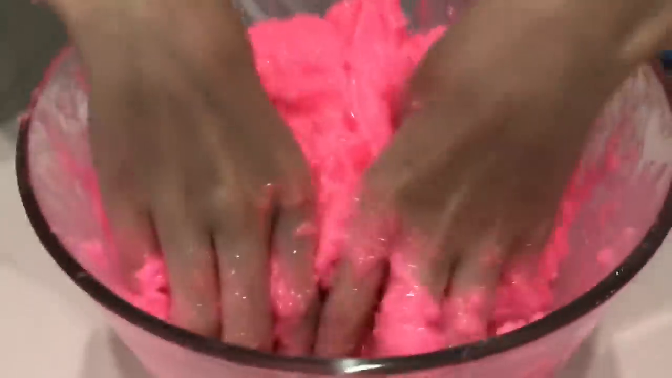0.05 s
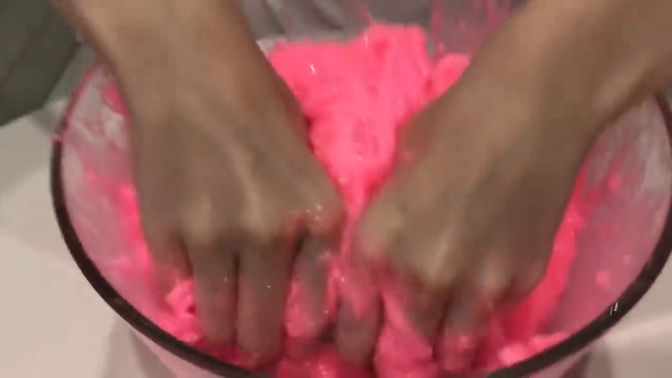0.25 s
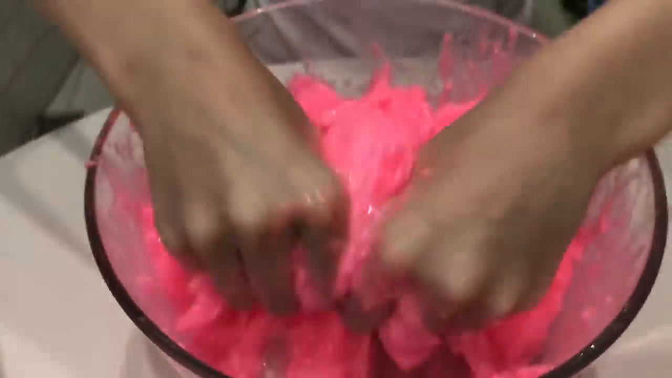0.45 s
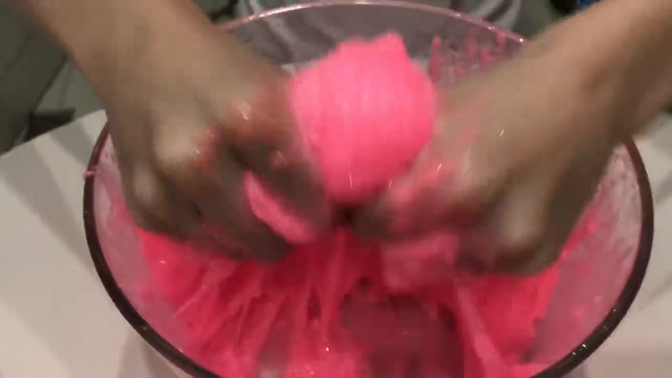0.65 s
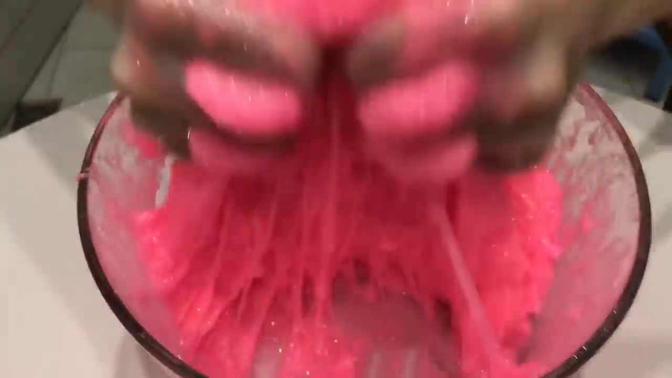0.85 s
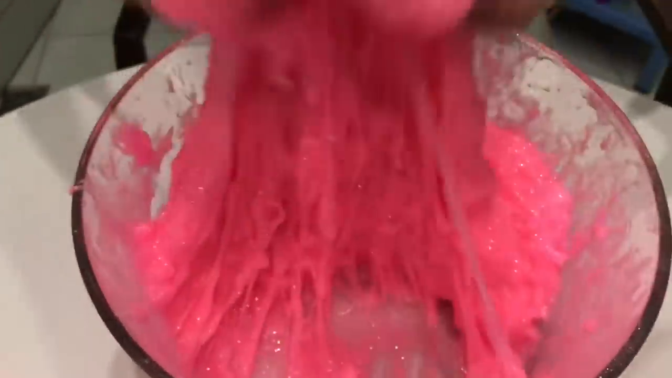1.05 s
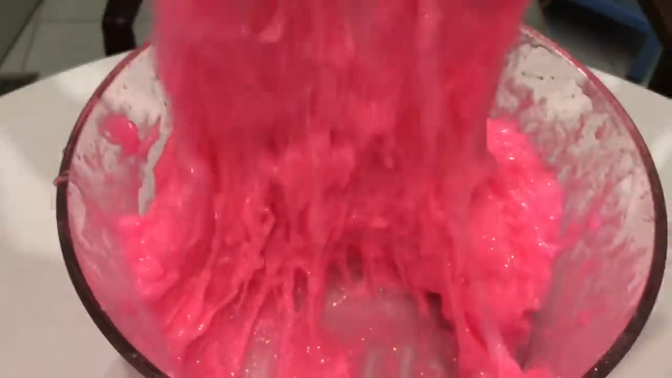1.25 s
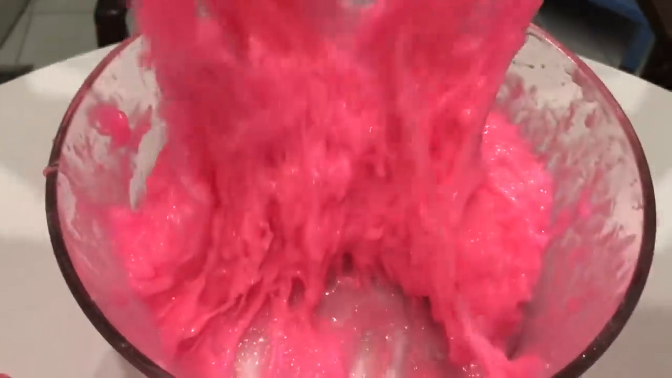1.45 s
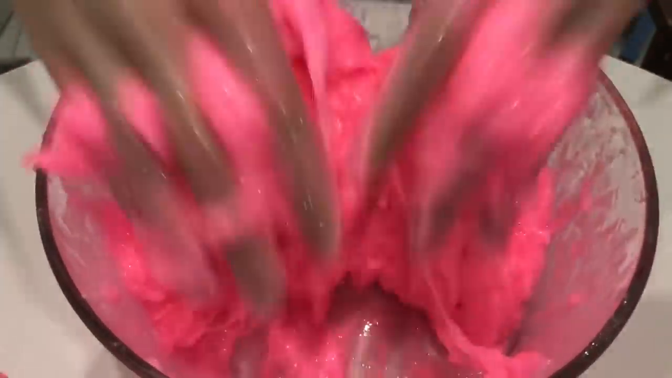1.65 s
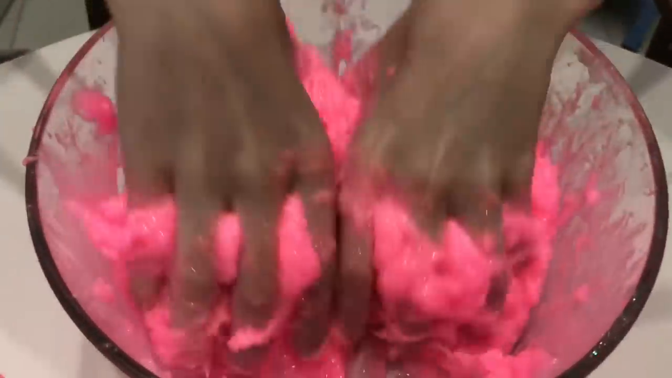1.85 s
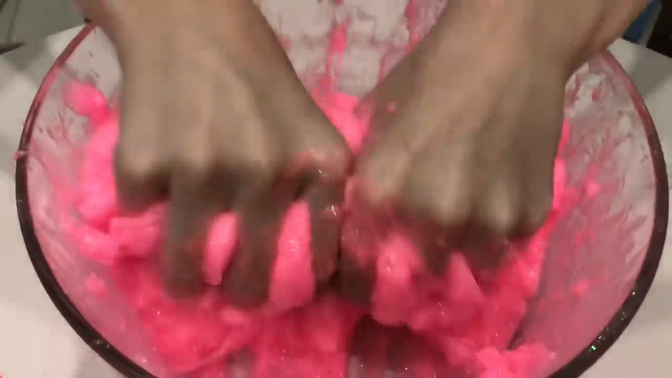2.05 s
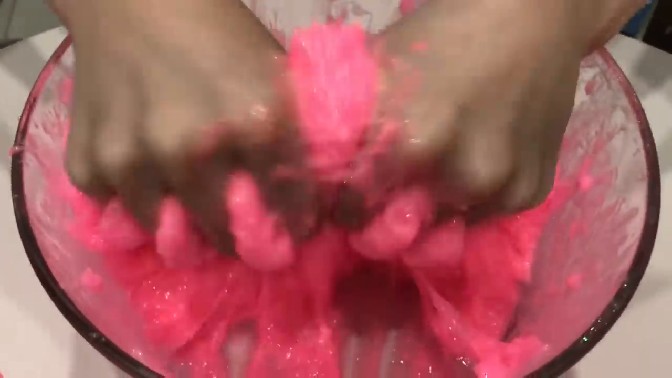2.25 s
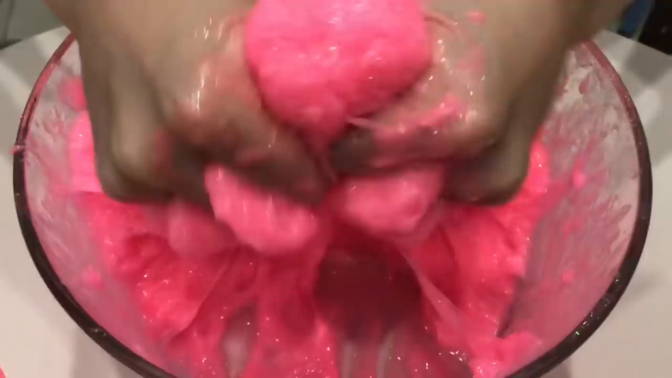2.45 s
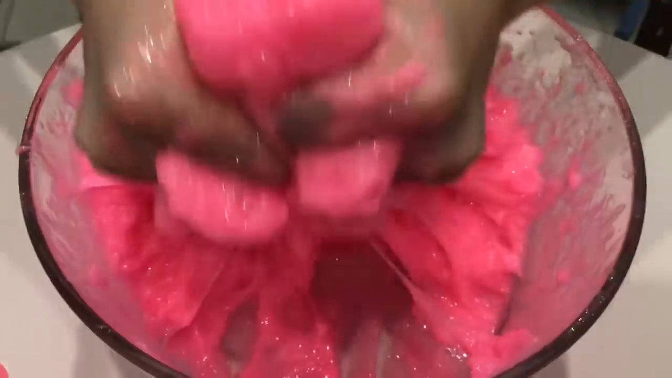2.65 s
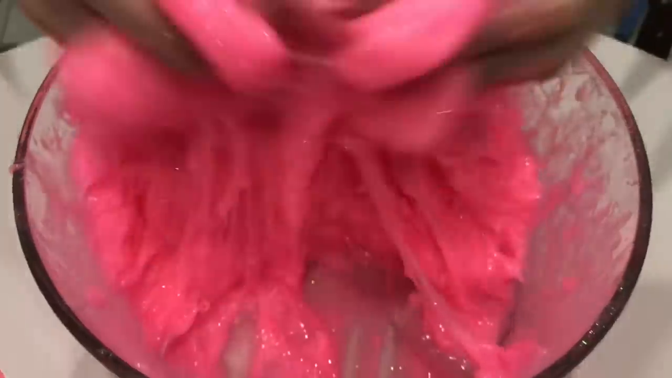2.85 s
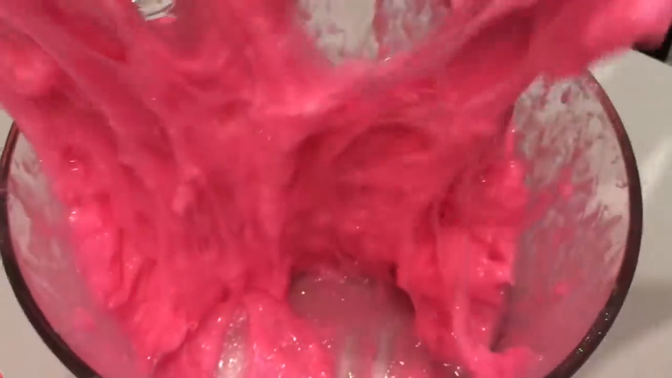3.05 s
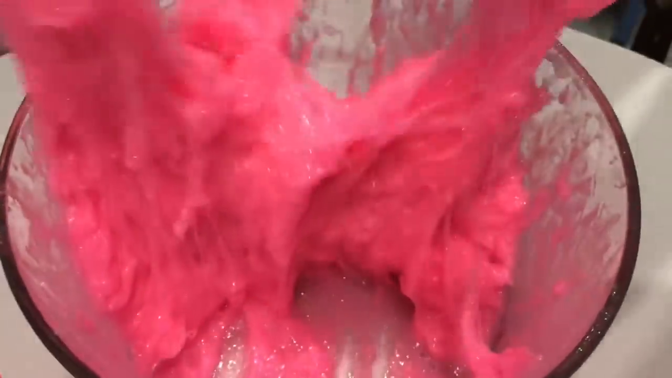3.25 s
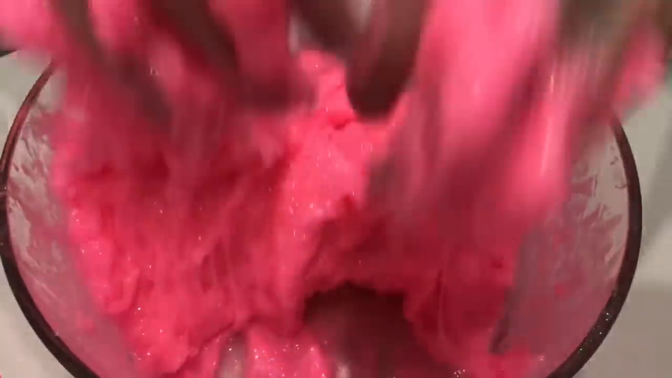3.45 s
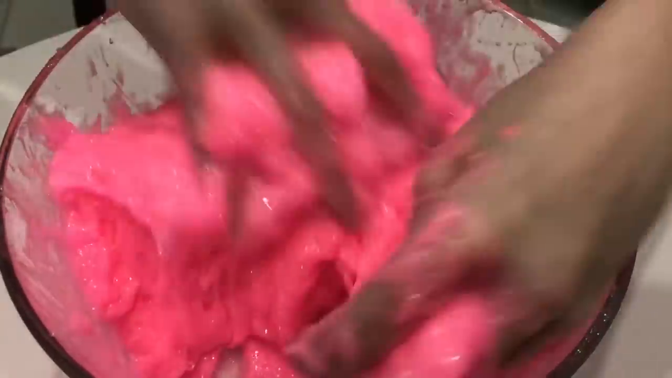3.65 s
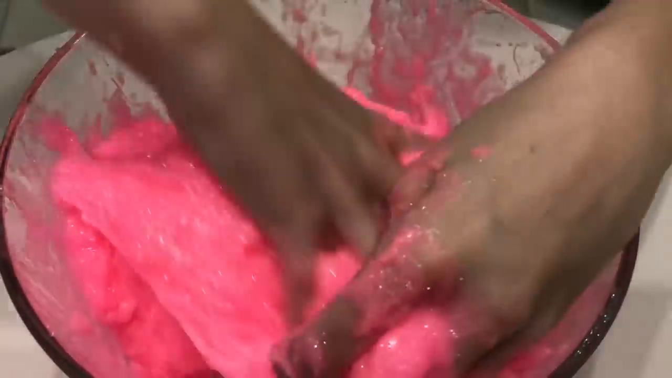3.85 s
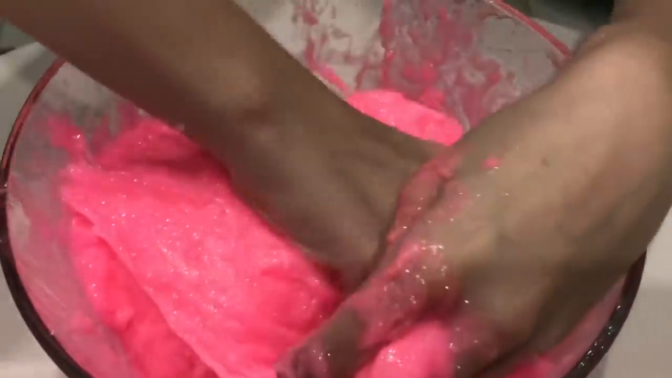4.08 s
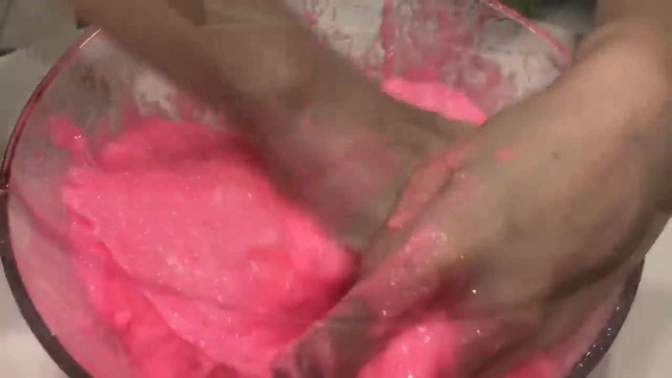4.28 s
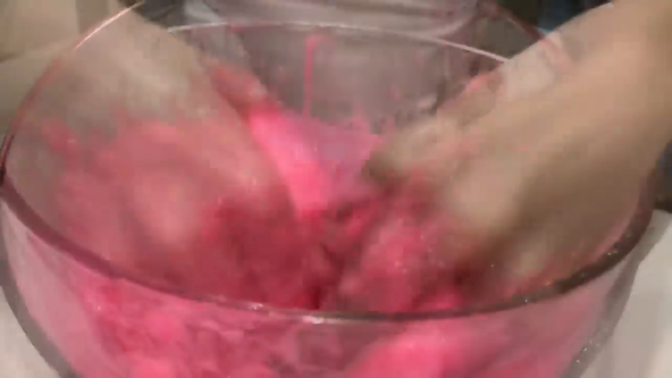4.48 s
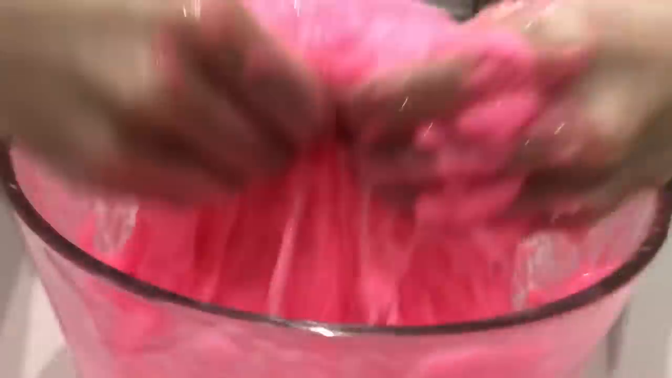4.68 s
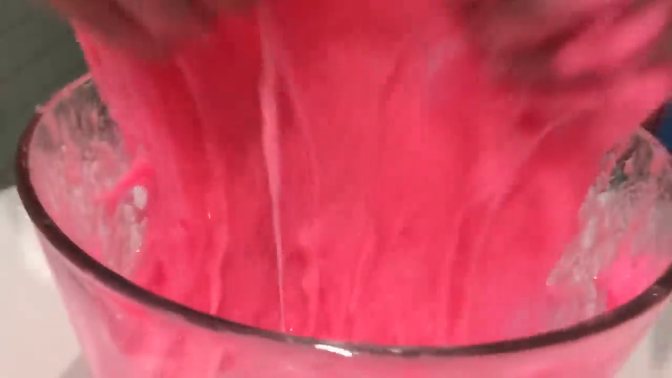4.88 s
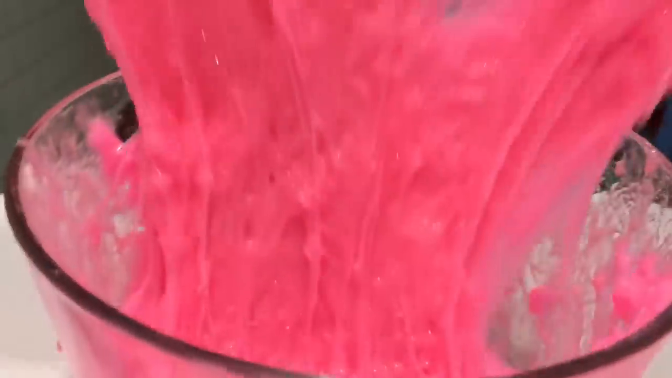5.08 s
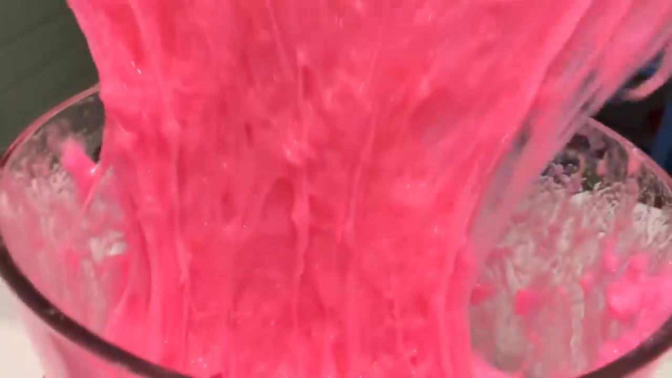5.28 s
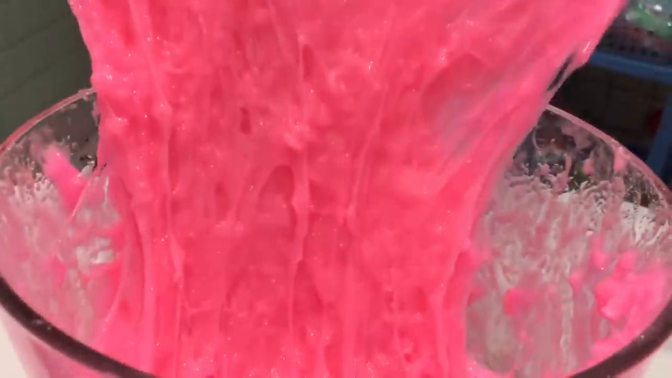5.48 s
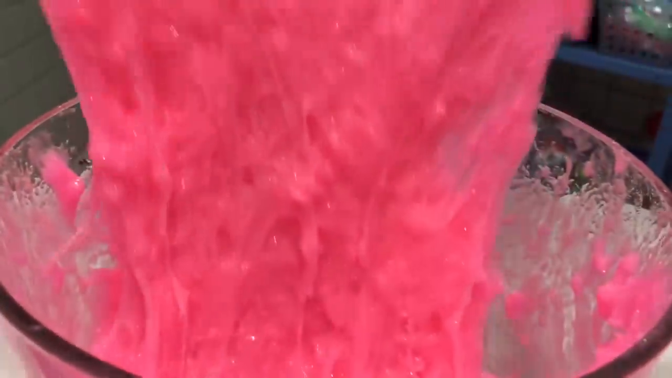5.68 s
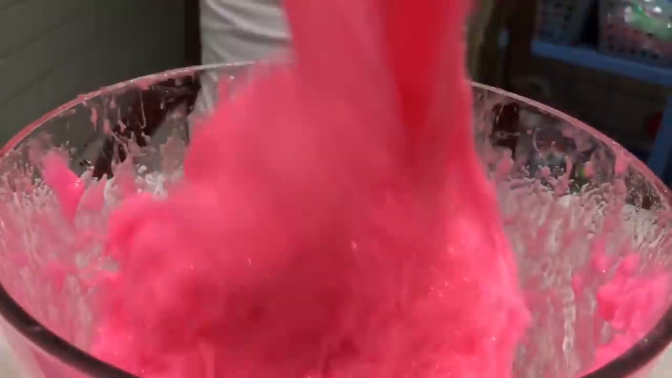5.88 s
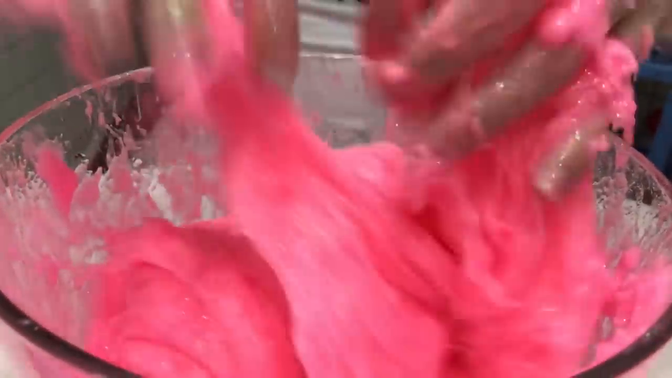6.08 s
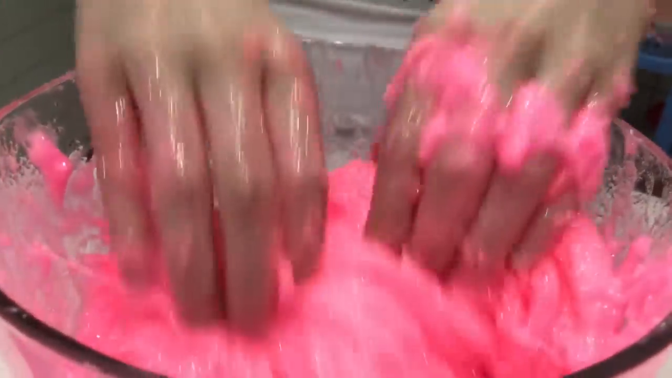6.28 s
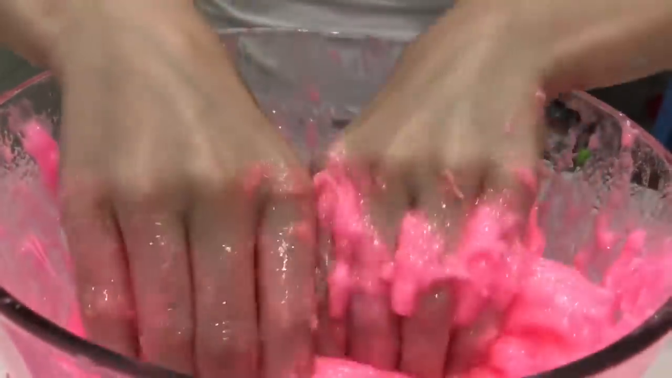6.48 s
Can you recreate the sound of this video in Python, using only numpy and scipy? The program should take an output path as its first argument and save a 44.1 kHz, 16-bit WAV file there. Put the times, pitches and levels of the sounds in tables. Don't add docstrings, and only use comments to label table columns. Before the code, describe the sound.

Thick slime is squeezed and stretched in a bowl beside a phone microphone. Wet, gluey crackling and crisp snaps come in uneven clusters, with trapped air bursting in short, round pops. After a brief lull midway the kneading returns, and low, woody-glassy rubbing hums swell as the bowl shifts. The crackle then thins before one big low pop and a last small flurry. Short room reflections, soft room tone and far hum.

```python
import sys
import numpy as np
from scipy import signal
from scipy.io import wavfile
from scipy.ndimage import uniform_filter1d

SR = 44100
rng = np.random.default_rng(int(sys.argv[2]) if len(sys.argv) > 2 else 0)


def store_wav(level_fs):
    pcm = np.round(np.clip(np.atleast_2d(level_fs), -1, 1) * 32767)
    wavfile.write(sys.argv[1], SR, pcm.T.astype(np.int16))


def rack_gain(trim_db):
    fader = np.asarray(trim_db, float)
    return 10 ** (fader / 20)


N = 287541


def evened(x):
    return x / np.sqrt(np.mean(x ** 2) + 1e-20)


def read(points, hz):
    f, value = np.transpose(points)
    return np.interp(np.log(hz + 1), np.log(f + 1), value)


def curve(rows, order):
    rows = np.array(rows)
    return np.interp(np.arange(N) / SR, rows[:, 0], rows[:, order])


def add(mix, start_s, sound):
    part = mix[max(round(start_s * SR), 0):][:len(sound)]
    part += sound[:len(part)]


def resonate(x, hz, width_hz):
    return signal.lfilter(*signal.iirpeak(hz, hz / width_hz, SR), x)


def air():
    # frequency in Hz, density in dB per Hz.
    air_spectrum = [(16, -10), (79, 5.5), (177, 2), (434, -4), (1700, -14), (4420, -16.5), (9500, -23),
                    (16000, -26)]
    # time in seconds, level in dB.
    hiss_drift = [(0.0, -55.5), (0.54, -46), (1.72, -52.5), (1.96, -52.5), (3.59, -59), (3.94, -53),
                  (5.06, -52), (6.52, -58.5)]
    hop, size = 512, 2048
    frames, hz = N // hop + 5, np.fft.rfftfreq(size, 1 / SR)
    real, imag, patches = rng.standard_normal((frames, len(hz), 3)).T
    patches = uniform_filter1d(patches, 20, 0)
    patches = evened(uniform_filter1d(patches, 8, 1))
    drift_db = np.interp(np.arange(frames) * hop / SR, *np.transpose(hiss_drift)) + 58
    share = read([(300, 0.39), (2500, 0.67)], hz)[:, None]
    level_db = read(air_spectrum, hz)[:, None] + 2.56 * patches + share * drift_db
    z = (real + 1j * imag) * rack_gain(level_db)
    noise = signal.istft(z, nperseg=size, noverlap=size - hop)[1][:N]
    return rack_gain(-46) * evened(noise)


def hum():
    return rack_gain(-54.5) * evened(resonate(rng.standard_normal(N), 61.2, width_hz=4.3))


def rub():
    # peak time in seconds, level in dB, length in seconds.
    drags = [(.34, -47, 0.077), (0.516, -35, 0.12), (0.702, -39, 0.046), (0.918, -40, .1),
             (1.064, -37, 0.27), (1.893, -32.5, 0.11), (2.182, -46, 0.083), (3.095, -36, 0.21),
             (4.128, -31.5, 0.15), (4.377, -33, 0.083), (4.49, -30, 0.035), (4.7, -45, 0.069),
             (4.852, -29, 0.18), (5.075, -27.5, 0.075), (5.198, -24, 0.087), (5.392, -33, 0.3)]
    # frequency in Hz, width in Hz, level in dB.
    bowl_modes = [(167, 12, -6), (206, 17, -1), (230, 28, -3), (268, 45, -6), (350, 18, -14),
                  (597, 24, -16), (1110, 110, -22), (2360, 80, -17)]
    rest_db, rise_db, fall_db = -55.5, 19, 26
    t = np.arange(N) / SR
    pull = np.full(N, rack_gain(rest_db))
    for peak_s, db, length_s in drags:
        u = (t - peak_s) / length_s
        pull += rack_gain(db + np.minimum(rise_db * u, -fall_db * u))
    unevenness_db = 1.7 * evened(uniform_filter1d(rng.standard_normal(N), 900))
    slips = rng.standard_normal(N) * rack_gain(unevenness_db)
    slips *= np.roll(pull * rack_gain(15.5), -500)
    modes = np.zeros(N)
    for hz, width_hz, db in bowl_modes:
        ring = resonate(resonate(slips, hz, width_hz), hz, width_hz)
        modes += 4 * rack_gain(db) * ring * np.sqrt(30 / width_hz)
    table_top = rack_gain(-16) * resonate(slips, 520, width_hz=340)
    return modes + table_top


def cavity(hz, turns, glide, rough, noise):
    u = np.arange(len(noise)) * hz / SR / turns
    shape = u ** 1.11 * np.exp(-.6 * u ** 2)
    ring = shape * np.cos(2 * np.pi * turns * (u - 1) * (1 + glide * u))
    fuzz = shape * noise
    for _ in range(2):
        fuzz = resonate(fuzz, 0.9 * hz, 1.83 * hz)
    return (1 - rough) * ring / abs(ring).max() + rough * 1.69 * fuzz / abs(fuzz).max()


def tick(noise, t60_s):
    high = signal.sosfilt(signal.butter(3, 7600, "high", fs=SR, output="sos"), noise)
    t = np.arange(len(noise)) / SR
    attack = 1 - np.exp(-t / 0.00036)
    return 1.42 * evened(high) * attack * rack_gain(-60 * t / t60_s)


def scatter(burst, chance, wall_db, t60_s):
    where, sign = chance
    path = np.zeros(200)
    path[(6 + 190 * where ** 1.5).astype(int)] = 2 * sign - 1
    path *= rack_gain(wall_db - 60 * np.arange(200) / SR / t60_s)
    path[0] = 1
    return np.convolve(burst, path)


def bursts():
    # start in seconds, cavity peak in dB, cavity in Hz.
    clean = [(.2913, -18.5, 1770), (.4078, -22, 4360), (.6121, -2, 2470), (.7034, -16.5, 5170),
             (.8273, -17, 6100), (1.1058, -18, 4560), (2.147, -19, 5820), (2.3441, -9.5, 5300),
             (2.3583, -7, 2940), (2.3628, -10, 2960), (2.3972, -20, 4470), (2.4357, -12.5, 2010),
             (2.6605, -14.5, 2130), (2.7524, -32, 4300), (2.8132, -11, 2220), (2.9551, -12, 2970),
             (3.019, -20.5, 6190), (3.067, -19.5, 2940), (3.6666, -22, 2960), (4.1268, -5, 4800),
             (4.1952, -24, 3140), (4.2526, -18.5, 3860), (4.4343, -11.5, 4350), (4.496, -22.5, 3470),
             (4.8178, -21.5, 3650), (5.233, -11.5, 5760), (5.3237, -5.5, 5870), (5.7763, -14, 5800),
             (6.1755, -21.5, 4650), (6.4144, -23, 5360)]
    # start in seconds, cavity peak in dB, cavity in Hz.
    torn = [(.295, -16.5, 1690), (.3756, -15, 3900), (.6983, -21.5, 4620), (.7163, -20, 3350),
            (.9279, -17, 3740), (1.199, -20, 4500), (1.2247, -18.5, 3600), (1.2486, -2.5, 5300),
            (1.2897, -13, 4850), (1.8142, -15.5, 3760), (1.8338, -15.5, 4260), (1.8775, -17, 3770),
            (1.9082, -21, 5800), (1.978, -15, 2860), (1.9934, -19, 4720), (2.0704, -18, 5430),
            (2.0996, -25, 4830), (2.192, -9, 2860), (2.4428, -7, 2100), (2.947, -9.5, 3520),
            (2.964, -17, 2970), (2.9882, -12.5, 5770), (3.6903, -17.5, 6650), (3.988, -10.5, 5250),
            (4.0607, -15.5, 5450), (4.0778, -4.5, 5000), (4.1197, -9, 5500), (4.3981, -13.5, 2930),
            (4.6097, -15.5, 4250), (5.5891, -21, 5900)]
    # start in seconds, cavity peak in dB, cavity in Hz.
    small = [(.1587, -23, 5430), (.2597, -22, 2620), (.3434, -30, 4380), (.584, -28, 3930),
             (.749, -21.5, 5360), (1.2175, -23, 4950), (1.7021, -24, 5300), (1.794, -25, 4550),
             (2.2555, -27, 2970), (2.5066, -21.5, 4520), (2.7017, -32, 4640), (3.428, -31.5, 5040),
             (3.463, -37, 6100), (3.503, -29.5, 5500), (3.596, -36, 5500), (3.9434, -21.5, 2200),
             (4.087, -24, 4300), (4.165, -22, 3510), (4.3227, -20.5, 1810), (4.392, -17.5, 5250),
             (4.531, -19.5, 4450), (4.7484, -19.5, 3400), (4.9655, -27, 4240), (5.616, -19, 5900),
             (5.6627, -26.5, 5650), (5.8755, -29.5, 3750), (6.118, -24.5, 4500), (6.296, -26.5, 4230),
             (6.4381, -21.5, 5570), (6.4849, -18.5, 4840)]
    # start in
    # seconds, film peak in dB.
    films = [(0.095, -15.5), (0.1804, -20), (0.2497, -20), (0.988, -12), (1.1863, -12.5), (1.2026, -4.5),
             (1.2108, -7), (1.3335, -19.5), (1.3811, -20), (1.437, -25), (1.7511, -21), (1.827, -12),
             (1.84, -11.5), (2.0256, -16), (2.162, -9), (2.278, -19), (2.3393, -6.5), (2.388, -9),
             (2.5525, -22), (2.9204, -10.5), (2.976, -3.5), (3.112, -11.5), (3.842, -12.5), (3.9316, -20.5),
             (4.077, -1), (5.173, -16.5), (5.4226, -18), (5.845, -27), (5.908, -22), (6.365, -20),
             (.3285, -23), (0.447, -13.5), (.7075, -14), (0.815, -29), (1.0826, -29), (1.1268, -32),
               (1.3945, -20), (1.9737, -19), (2.0746, -18), (2.1982, -23), (2.547, -20), (2.7745, -28),
               (3.045, -30), (3.074, -24), (3.532, -30), (3.562, -31), (3.777, -22), (3.8023, -17),
               (3.8367, -18), (4.1593, -19), (4.642, -18.5), (5.0599, -23), (5.606, -23), (5.6737, -21),
               (5.917, -27.5), (5.979, -38), (6.033, -24.5), (6.097, -28), (6.2838, -25), (6.447, -28)]
    rows = []
    for kind, tick_db in ((clean, -23), (torn, -2.5), (small, 0)):
        rows += [(s, db, hz, tick_db) for s, db, hz in kind]
    film_tick_db, film_cavity_hz = 15, 3860
    for s, film_db in films:
        rows.append((s, film_db - film_tick_db, film_cavity_hz, film_tick_db))
    return rows


def tearing():
    starts = np.zeros(N)
    for s, db, hz, tick_db in bursts():
        strength = rack_gain(0.59 * (db + max(tick_db, 0) + 13))
        add(starts, max(s - .012, 0), strength * np.ones(1))
    t = np.arange(6000) / SR
    swell = t / 0.022 * np.exp(1 - t / 0.016)
    return 1 + 0.65 * signal.oaconvolve(starts, swell)[:N]


def crackle():
    # time in seconds, crackle in dB, film tick in dB above the cavities.
    working = [(0.0, -40, -2), (.2, -50, 3), (.47, -38.5, -4.5), (.9, -41, 0.5), (1.25, -47.5, 4.5),
               (1.6, -50.5, 3), (1.94, -37, 3), (2.4, -40.5, 1), (2.74, -51, -2), (2.98, -39.5, 4.5),
               (3.3, -46, 3.5), (3.54, -74, -2), (3.74, -44.5, 10), (4.05, -39, 0), (4.5, -46.5, 4),
               (5.25, -44.5, -1.5), (5.9, -55.5, 12), (6.35, -40.5, -0.5)]
    rate_hz, kinds = 600, 48
    size = rack_gain(4.55 * np.minimum(rng.exponential(1, N), 4.5)) * (rng.random(N) < rate_hz / SR)
    kind = rng.integers(0, kinds, N)
    noise, walls = rng.standard_normal((kinds, 2, 200)), rng.random((kinds, 2, 24))
    rings, ticks = np.zeros((2, N))
    for k, hz in enumerate(np.geomspace(1100, 6500, num=kinds)):
        ring = cavity(hz, turns=0.61, glide=0.014, rough=0.64, noise=noise[k, 0])
        film = tick(noise[k, 1], t60_s=0.0014)
        places = np.flatnonzero(size * (kind == k))
        for layer, burst in ((rings, ring), (ticks, film)):
            burst = scatter(burst, walls[k], wall_db=-9.5, t60_s=0.071)
            for i in places:
                add(layer, i / SR, size[i] * burst)
    level = rack_gain(curve(working, order=1) - 5.5)
    bright = rack_gain(curve(working, order=2))
    return level * tearing() * (evened(rings) + bright * evened(ticks))


def snaps():
    out, rows = np.zeros(N), bursts()
    noise, walls = rng.standard_normal((len(rows), 2, 200)), rng.random((len(rows), 2, 24))
    for (s, db, hz, tick_db), (lip, film), wall in zip(rows, noise, walls):
        cleanness = np.clip(-tick_db / 25, 0, 1)
        turns = (0.76 + 0.59 * cleanness) * (hz / 3000) ** 0.62
        ring = cavity(hz, turns, glide=0.042, rough=.4 - 0.059 * cleanness, noise=lip)
        burst = ring + rack_gain(tick_db + 1.5) * tick(film, t60_s=0.0037)
        add(out, s - .0003, rack_gain(db + 2.0) * scatter(burst, wall, wall_db=-7.0, t60_s=0.014))
    return out


def pops():
    # start in seconds, peak in dB, cavity in Hz, turns to the peak.
    pockets = [(2.191, -23.5, 370, 0.89), (0.2908, -11, 1300, 1.15), (0.2949, -11.5, 1300, 0.89),
               (.3053, -25, 810, 1.37), (0.3744, -19, 1270, 0.54), (.7088, -24.5, 444, 1.38),
               (.7154, -26, 550, 1.24), (0.9265, -29, 1520, 1.5), (1.249, -15.5, 2100, 1.17),
               (3.16, -34, 520, 1.9), (1.8747, -18, 680, 1.04), (1.917, -23.5, 1210, 1),
               (2.0414, -13, 804, 1.44), (2.17, -13.5, 660, 1.2), (2.3385, -20.5, 597, 0.68),
               (2.3584, -9, 1200, 0.94), (2.436, -12, 1690, 1.3), (2.442, -17.5, 630, 0.72),
               (2.9874, -26, 1600, 1.4), (3.6675, -27.5, 1370, 0.62), (3.943, -18.5, 800, 0.84),
               (4.1186, -24.5, 920, 0.98), (4.2567, -12.5, 1630, .6), (4.3203, -18.5, 1500, 0.72),
               (4.436, -19, 1580, 1.2), (4.9846, -28.5, 1370, 1.75), (5.218, -20, 1100, 0.78),
               (6.2039, -18.5, 775, 0.51), (6.208, -2, 960, 0.98), (6.512, -17.5, 1570, 0.49)]
    out = np.zeros(N)
    noise, walls = rng.standard_normal((len(pockets), 600)), rng.random((len(pockets), 2, 4))
    for (s, db, hz, turns), lip, wall in zip(pockets, noise, walls):
        burst = cavity(hz, max(turns, .3), glide=0.019, rough=0.23, noise=lip)
        burst = scatter(burst, wall, wall_db=-9.5, t60_s=0.022)
        mellowed = signal.lfilter(*signal.butter(2, 2.3 * hz, fs=SR), burst)
        add(out, s - .0007, rack_gain(db + 2.0) * mellowed)
    return out


def tail():
    # delay in seconds, level in dB.
    echoes = [(.0036, -16), (0.009, -16), (0.0113, -19), (.017, -42), (.023, -20.5)]
    # frequency in Hz, t60 in seconds.
    room_decay = [(400, 0.72), (1100, 0.39), (2800, 0.29), (7000, 0.39), (15000, 0.089)]
    taps = np.zeros(SR // 2)
    at = np.arange(350, len(taps) - 20, 20)
    taps[at + rng.integers(0, 20, len(at))] = rng.choice([-1., 1.], len(at))
    hz, t, z = signal.stft(taps, SR, nperseg=256)
    decay = rack_gain(-60 * t / read(room_decay, hz)[:, None])
    path = signal.istft(z * decay, SR, nperseg=256)[1]
    path *= rack_gain(-14.0) / np.linalg.norm(path)
    for delay_s, db in echoes:
        add(path, delay_s * rng.uniform(1.0, 1.04), rack_gain(db) * np.ones(1))
    return signal.lfilter(*signal.butter(1, [800, 9000], "band", fs=SR), path)


def space(x):
    turn = np.pi * 7.3 * np.arange(N) / SR
    out = x.copy()
    for k in range(3):
        share = np.sqrt(2 / 3) * np.cos(turn + np.pi * k / 3)
        out += signal.oaconvolve(x * share, tail())[:N]
    return out


def microphone(x):
    # frequency in Hz, gain in dB.
    port_response = [(1500, 2.5), (3000, 5), (5500, 5.5), (7500, -1.5), (9300, 3.5), (10500, 0),
                     (12500, 4.5), (15500, -2.5)]
    hz = np.linspace(0, SR / 2, 129)
    gain = rack_gain(2 * read(port_response, hz))
    port = signal.minimum_phase(signal.firwin2(255, hz, gain, fs=SR))
    return signal.oaconvolve(x, port)[:N]


def scene():
    slime = microphone(space(snaps() + pops() + crackle()))
    slime = signal.lfilter(*signal.butter(2, 260, "high", fs=SR), slime)
    return (slime + rub() + air() + hum())[None]


def top_cut(x):
    return signal.sosfilt(signal.butter(12, 16650, fs=SR, output="sos"), x)


def record(dry):
    low_pass = signal.firwin(255, 15950, window=("kaiser", 7), fs=SR)
    held = signal.oaconvolve(np.clip(dry, -1, 1), low_pass[None], "same")
    return top_cut(held)


dry = scene()
out = record(dry)
store_wav(out)
```